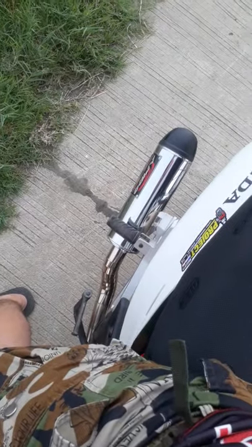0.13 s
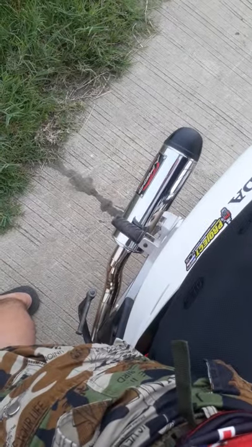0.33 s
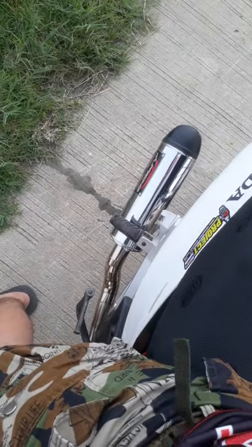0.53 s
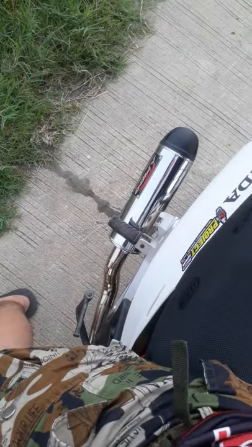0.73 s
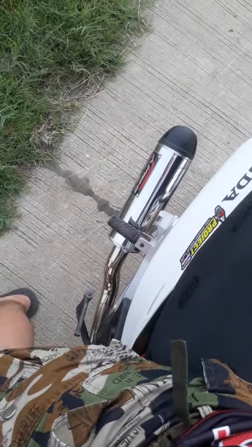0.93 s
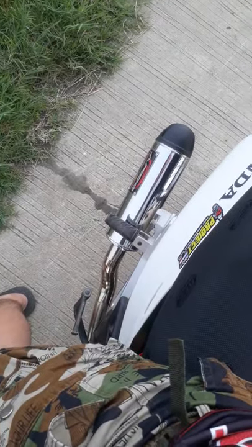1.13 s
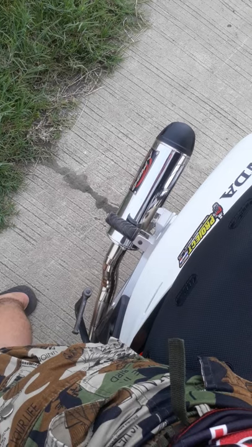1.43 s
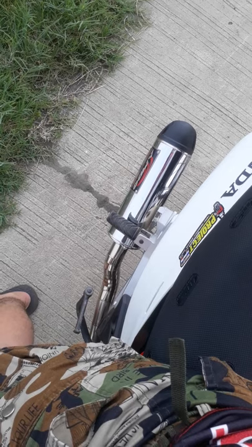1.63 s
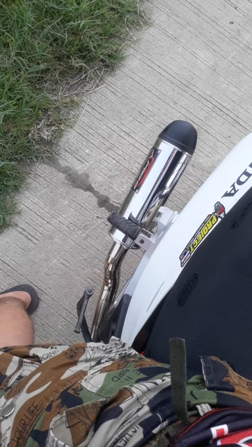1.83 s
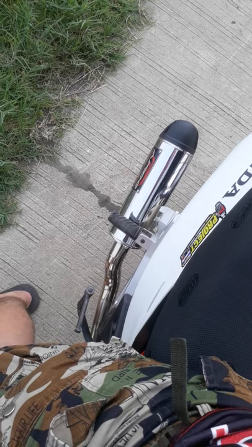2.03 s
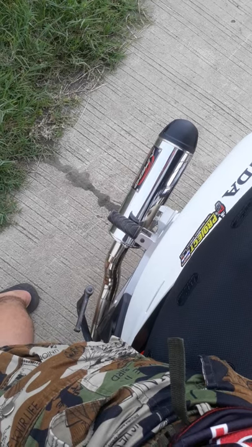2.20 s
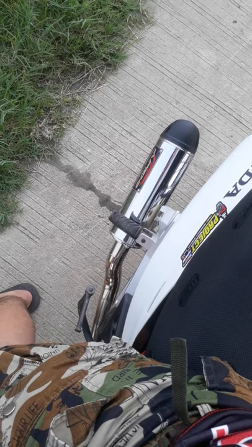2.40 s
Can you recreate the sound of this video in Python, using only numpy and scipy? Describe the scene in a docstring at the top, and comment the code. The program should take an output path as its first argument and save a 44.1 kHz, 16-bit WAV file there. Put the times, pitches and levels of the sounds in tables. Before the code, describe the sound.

Close single-cylinder dirt bike exhaust climbs quickly, then hammers the limiter with steady stuttering cracks

```python
"""A single-cylinder motorcycle engine: idle firings fade as the throttle closes, then it revs to its limiter.
There the first firing meets a cut of ten cycles; then four or five fire, nine or ten are cut, and so on.
Fired cycles boom, crack hard in the hot pipe and arrive early; with the spark cut, each cycle is a smoother
puff with a weaker crack while the speed sags. Crank hum and rattle run underneath throughout.
Pulses are shaped pressure dips with ringing tones and noise bursts; hum is cosines, rattle is shaped noise."""
import sys
import numpy as np
from scipy import signal
from scipy.fft import rfft, irfft
from scipy.io import wavfile
from scipy.ndimage import uniform_filter1d

SR = 44100
rng = np.random.default_rng(int(sys.argv[2]) if len(sys.argv) > 2 else 0)


def rack_gain(trim_db):
    """Turn a fader trim in dB into the linear factor to multiply a signal by."""
    fader = np.asarray(trim_db, float)
    return 10 ** (fader / 20)


def store_pcm(level_fs):
    """Save levels as 16-bit WAV."""
    pcm = np.round(np.clip(level_fs, -1, 1) * 32767).astype(np.int16)
    wavfile.write(sys.argv[1], SR, np.atleast_2d(pcm).T)


N = 112896

# firings as the throttle closes, before the rev-up: [start_s, puff_db, crack_db, boom_db]
IDLE_FIRINGS = [(.0077, -4.5, -31.5, -8), (.0292, -4, -33, -10.5), (.0507, -6.5, -23, -10.5),
                (.0722, -18.5, -36, -16), (.094, -25.5, -53, -20)]
# course of the speed while revving up, scaled to fit REV_CYCLES: [time_s, speed_hz (cycles per s)]
REV_SPEED = [(.11, 46.2), (.22, 48.9), (.29, 53), (.5, 70.1), (.56, 74.8), (.615, 78)]
# load while revving up: [time_s, puff_db, crack_db, boom_db, hum_db, rattle_db, puff_pitch (factor)]
ENGINE_LOAD = [(0, -19, -50, -30, -37, -31, 0.78), (.11, -19, -55, -18.5, -25, -32, 0.45),
               (.19, -10.5, -33, -15.5, -30.5, -29.5, 0.6), (.26, -1.5, -23.5, -11.5, -27, -28, 0.81),
               (.34, 0.5, -16.5, -15, -30, -29.5, 0.86), (.45, 0, -12, -14.5, -23, -26, 0.88),
               (.55, -2, -13, -9, -17.5, -21.5, 0.85), (.63, -2, -13.5, -24, -18.5, -23, 0.88)]
# limiter rounds, the last row marking the end: [start_s, fired (cycles), cut (cycles)]
LIMITER_ROUNDS = [(.6135, 1, 10), (.7566, 5, 10), (.9508, 4, 9), (1.1195, 4, 9), (1.2884, 4, 9),
                  (1.4574, 4, 9), (1.6266, 4, 9), (1.7957, 5, 10), (1.99, 4, 9), (2.1589, 4, 9),
                  (2.3279, 4, 9), (2.4974, 5, 10), (2.6916, 0, 0)]
# crack strength of the fired cycles in each round: [crack_db]
ROUND_CRACK = [-10, -14, -12.5, -13.5, -14, -14.5, -12, -13.5, -15, -13.5, -12, -13.5]
# relative spectrum of an unfired puff: [freq_hz, level_db]
COLD_COLOUR = [(200, -60), (300, 1), (390, 0), (620, 1.5), (700, -8.5), (850, -20.5), (1100, -17),
               (2200, -43), (6000, -48)]
# relative spectrum of a fired puff, before its pitch factor: [freq_hz, level_db]
HOT_COLOUR = [(200, -47), (300, -4.5), (440, 2.5), (560, 6), (680, 5), (900, -8), (1300, -9), (2200, -17),
              (3000, -87), (6000, -92)]
# long pipe tones rung by a firing, relative to its boom: [pitch_hz, level_db, t60_s]
BOOM_TONES = [(146, -8, 0.1), (182.8, 1.5, 0.079)]
# short pipe tones rung by every puff, relative to the puff: [pitch_hz, level_db, t60_s]
PIPE_TONES = [(820, -16.5, 0.02), (1084, -20, 0.022), (1260, -35, 0.06), (1598, -23.5, 0.022),
              (2112, -23, 0.022)]
# low push of a full-load firing, sounded at 0.8 of this pitch: [pitch_hz, level_db, t60_s]
THUMP_TONES = [(69, -17, 0.062)]
# metal and tailpipe resonances, relative to each other: [pitch_hz, width_hz, level_db]
METAL_RING = [(1586, 188, 1.5), (2064, 296, 1), (3490, 587, 1), (5410, 940, -10), (6590, 550, -14.5),
              (8610, 380, -11), (10650, 3200, -24.5), (14400, 2300, -33.5)]
# crank hum tones, relative to the load's hum: [multiple (of the cycle rate), level_db]
HUM_TONES = [(1, -10), (2, 1), (3, -6.5)]
# boost of the odd hum multiples, which come up with speed: [time_s, level_db]
ODD_HUM_BOOST = [(.1, -13), (.3, 6), (.45, 0), (.6, 0.5)]
# relative spectrum of rattle and airflow between pulses: [freq_hz, level_db]
RATTLE_COLOUR = [(30, -38), (100, -14.5), (500, -12), (800, -18), (1200, -19), (1650, -19), (2130, -24),
                 (2660, -29), (3370, -28.5), (7690, -43.5), (8530, -40.5), (9730, -51), (13700, -52),
                 (16000, -66)]

REV_FROM_S, REV_CYCLES = .1118, 30
# top speed, and change per cycle while firing or cut, before a round is scaled to its length
TOP_HZ, GAIN_HZ, SAG_HZ = 78.1, .6, .36
HOT_EARLY_S = .0026  # fired cycles arrive this much earlier than unfired ones
COLD_DB, COLD_CRACK_DB, HOT_BOOM_DB = 0.5, -24.5, -17.5
HUM_LAG_TURNS, HUM_WAVER_DB = 0.05, 0.1
RATTLE_PULSE = 0.078  # swing of the rattle level over a cycle, as a fraction
PUFF_SPREAD_DB, CRACK_SPREAD_DB, BOOM_SPREAD_DB, COLOUR_SPREAD_DB = 0.1, 1.5, 0.2, 2.5
PITCH_SPREAD = .007  # as a fraction of the pitch
FIRST_PUFF_DB, FIRST_TICK_DB, TICK_DB = 3.5, 3.5, 13.5  # the first firing of a round is sharpest
COLD_LEAN, HOT_LEAN = .2, 0.1  # radians the dip tips backwards
PIPE_LEAD_S, CRACK_LEAD_S = 0.001016, 0.00033  # both start a little before the bottom of the dip
PIPE_RISE_S, BOOM_RISE_S = 0.00041, 0.0017
CRACK_RISE_S, CRACK_T60_S, TAIL_DB, TAIL_T60_S = 0.00083, 0.0058, -6, 0.015
SPIKY = 0.71  # how unevenly the crackle's grains are sized
DULL_BELOW_DB, BRIGHT_ABOVE_DB = -51, -11.5  # weak cracks are duller
DULL_HZ, DULL_TREBLE = 2440, 0.6  # lowpass, and the unfiltered part added to it
MIC_HZ = 54
CEILING, KNEE = .97, 5.  # full scale is 1; a higher knee bends later


def read(points, hz):
    """Reads a spectrum on a log-frequency axis."""
    f, value = np.transpose(points)
    return np.interp(np.log(hz + 1), np.log(f + 1), value)


def evened(x):
    """Brings a signal to unit rms."""
    return x / np.sqrt(np.mean(x ** 2) + 1e-20)


def wander(count, length, span):
    """Slow random drifts of unit rms overall, smoothed over a span of samples."""
    return evened(uniform_filter1d(rng.standard_normal((count, length)), span, axis=1))


def load(t, axis):
    """One column of the load table over time."""
    columns = np.transpose(ENGINE_LOAD)
    return np.interp(t, columns[0], columns[axis])


def add(mix, s, sound):
    """Mixes a sound in at a time; the mix has a margin of 1024 samples in front."""
    part = mix[round(s * SR) + 1024:][:len(sound)]
    part += sound[:len(part)]


def resonate(x, hz, width):
    """A two-pole resonance of peak gain 1."""
    return signal.lfilter(*signal.iirpeak(min(hz, SR / 2.2), hz / width, SR), x)


def ring_down(modes, scale, t):
    """Struck tones: sines that each die away exponentially."""
    return sum(rack_gain(db - 60 * t / t60) * np.sin(2 * np.pi * f * scale * t) for f, db, t60 in modes)


def cycles():
    """Every cycle from the rev-up on: (arrival s, fired, puff dB, crack dB, boom dB, pitch factor)."""
    t = np.linspace(REV_FROM_S, LIMITER_ROUNDS[0][0], 2000)
    turns = np.cumsum(np.interp(t, *np.transpose(REV_SPEED)))
    turns = (turns - turns[0]) / (turns[-1] - turns[0]) * REV_CYCLES
    arrivals = np.interp(range(REV_CYCLES), turns, t)
    rows = [(s, 1, *[load(s, axis=k) for k in (1, 2, 3, 6)]) for s in arrivals]
    hot_db, pitch = ENGINE_LOAD[-1][1], ENGINE_LOAD[-1][-1]
    for (s, fired, cut), (end, _, _), crack_db in zip(LIMITER_ROUNDS, LIMITER_ROUNDS[1:], ROUND_CRACK):
        below_top = np.r_[GAIN_HZ * np.arange(fired)[::-1], SAG_HZ * np.arange(cut)]
        gaps = 1 / (TOP_HZ - below_top)
        at = s + (np.cumsum(gaps) - gaps) * (end - s) / gaps.sum()
        rows += [(a, 1, hot_db, crack_db, HOT_BOOM_DB, pitch) for a in at[:fired]]
        rows += [(a + HOT_EARLY_S, 0, COLD_DB, COLD_CRACK_DB, -99, 1) for a in at[fired:]]
    return rows


def crank(rows):
    """Crank position in cycles at every sample, with the early arrival of firings undone."""
    at = np.array([s + fired * HOT_EARLY_S for s, fired, *_ in rows])
    # before the rev-up the crank turns at the first speed
    return np.interp(np.arange(N) / SR, np.r_[at[0] - 1, at], np.r_[-REV_SPEED[0][1], np.arange(len(at))])


def hum(turns):
    """Crank hum: low tones at whole multiples of the cycle rate, locked to the crank."""
    t = np.arange(N) / SR
    waver = wander(len(HUM_TONES), N, 900)
    odd_db = np.interp(t, *np.transpose(ODD_HUM_BOOST))
    tones = 0
    for (k, db), w in zip(HUM_TONES, waver):
        level = rack_gain(db + k % 2 * odd_db + HUM_WAVER_DB * w)
        tones = tones - level * np.cos(2 * np.pi * k * (turns + HUM_LAG_TURNS))
    return np.sqrt(2) * rack_gain(load(t, axis=4)) * tones


def rattle(turns):
    """Mechanical noise and airflow: shaped noise that swells once per cycle."""
    colour = rack_gain(read(RATTLE_COLOUR, np.fft.rfftfreq(N, 1 / SR)))
    noise = irfft(rfft(rng.standard_normal(N)) * colour, N)
    swell = 1 + RATTLE_PULSE * np.cos(2 * np.pi * turns)
    return rack_gain(load(np.arange(N) / SR, axis=5)) * evened(noise) * swell


def crackle(bright, dull, ticks):
    """Cracks: spiky noise bursts and single-sample ticks that ring the metal and the tailpipe."""
    size = N + 1024
    grit = evened(rng.standard_normal(size) * np.exp(SPIKY * rng.standard_normal(size)))
    lowpassed = signal.lfilter(*signal.butter(2, DULL_HZ, fs=SR), dull * grit)
    soft = DULL_TREBLE * dull * grit + lowpassed
    colour_db = COLOUR_SPREAD_DB * wander(len(METAL_RING), size, 500)

    def ring(x):
        """Parallel resonances of alternating sign, their levels drifting."""
        return sum((-1) ** k * resonate(rack_gain(db + colour_db[k]) * x, f, w)
                   for k, (f, w, db) in enumerate(METAL_RING))

    return 2 * ring(bright * grit + soft + ticks) / ring(grit).std()


def exhaust(rows):
    """Each cycle: a pressure dip that rings the pipe, a crackling burst, and after a firing a boom."""
    puffs, bright, dull, ticks = np.zeros((4, N + 1024))
    t, hz = np.arange(4096) / SR, np.fft.rfftfreq(2048, 1 / SR)
    luck = rng.standard_normal((len(rows), 6))
    crack_decay = rack_gain(-60 * t / CRACK_T60_S) + rack_gain(TAIL_DB - 60 * t / TAIL_T60_S)
    burst = (1 - np.exp(-(t / CRACK_RISE_S) ** 2)) * crack_decay
    pipe_rise = 1 - np.exp(-(t / PIPE_RISE_S) ** 2)
    boom_rise = 1 - np.exp(-t / BOOM_RISE_S)
    before = 1
    for (s, fired, puff_db, crack_db, boom_db, pitch), (a, b, c, d, e, g) in zip(rows, luck):
        first, before = fired > before, fired  # a firing straight after a cut
        lean = np.exp(1j * (HOT_LEAN if fired else COLD_LEAN))
        colour = HOT_COLOUR if fired else COLD_COLOUR
        spectrum = rack_gain(read(colour, hz / (pitch * (1 + PITCH_SPREAD * a))))
        dip = np.roll(irfft(lean * spectrum), 300)  # centred on sample 300
        size = rack_gain(puff_db + FIRST_PUFF_DB * first + PUFF_SPREAD_DB * b)
        add(puffs, s - 300 / SR, -size * dip / dip.max())

        detune = 1 + PITCH_SPREAD * e
        add(puffs, s - PIPE_LEAD_S, size * pipe_rise * ring_down(PIPE_TONES, detune, t))
        boom = rack_gain(boom_db + BOOM_SPREAD_DB * d)
        add(puffs, s, boom * boom_rise * ring_down(BOOM_TONES, detune, t))

        share = np.interp(crack_db, [DULL_BELOW_DB, BRIGHT_ABOVE_DB], [0, 1])  # bright part of the crack
        crack = rack_gain(crack_db + CRACK_SPREAD_DB * c)
        thump = fired * share * rack_gain(BOOM_SPREAD_DB * g)
        add(puffs, s, thump * boom_rise * ring_down(THUMP_TONES, 0.8, t))
        add(bright, s - CRACK_LEAD_S, share * crack * burst)
        add(dull, s - CRACK_LEAD_S, (1 - share) * crack * burst)
        tick = rack_gain([TICK_DB + FIRST_TICK_DB * first + CRACK_SPREAD_DB * g])
        add(ticks, s + CRACK_LEAD_S, share * crack * tick)
    return (puffs + crackle(bright, dull, ticks))[1024:]


def scene():
    """The whole engine in mono: exhaust, hum and rattle."""
    rows = cycles()
    turns = crank(rows)
    idle_pitch = ENGINE_LOAD[0][-1]
    idle = [(s, 1, puff, crack, boom, idle_pitch) for s, puff, crack, boom in IDLE_FIRINGS]
    return (exhaust(idle + rows) + hum(turns) + rattle(turns))[None]


def top_cut(x):
    """Nothing passes above the cut-off."""
    return signal.sosfilt(signal.butter(12, 16960, fs=SR, output="sos"), x)


def record(dry):
    """The microphone drops the lowest bass; the loudest peaks meet a soft ceiling."""
    x = signal.filtfilt(*signal.butter(2, MIC_HZ, "high", fs=SR), dry)
    mix = x / (1 + abs(x / CEILING) ** KNEE) ** (1 / KNEE)
    return top_cut(mix)


dry = scene()
out = record(dry)
store_pcm(out)
```